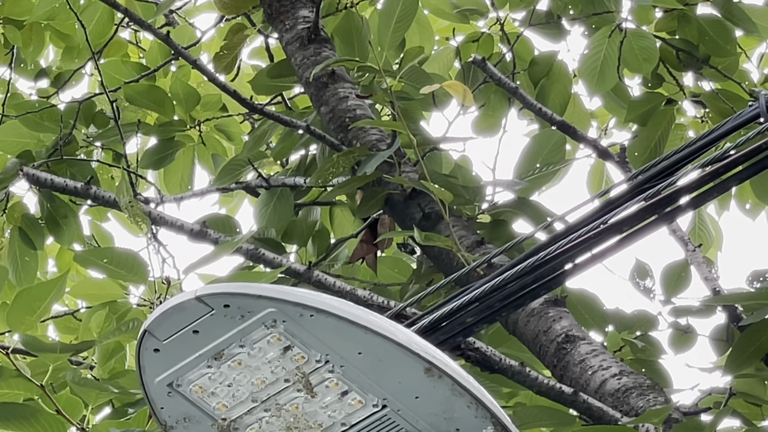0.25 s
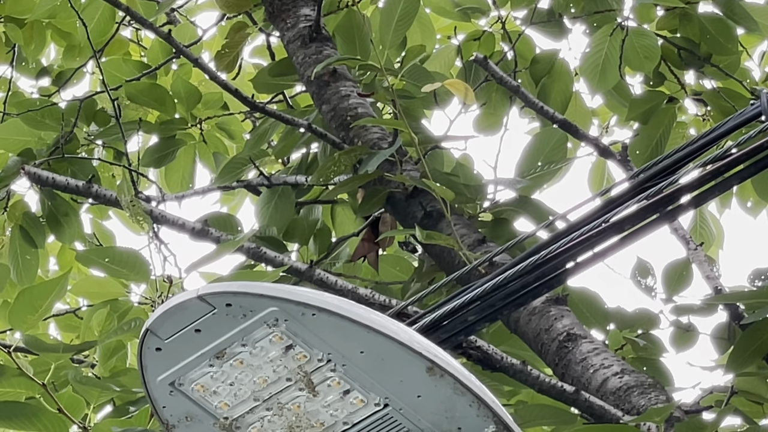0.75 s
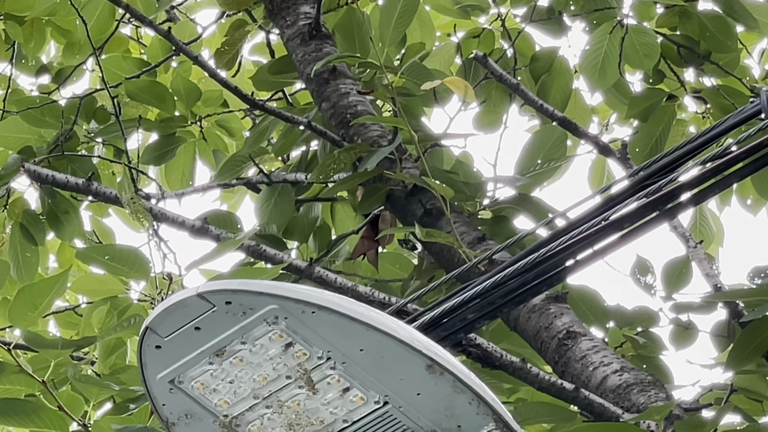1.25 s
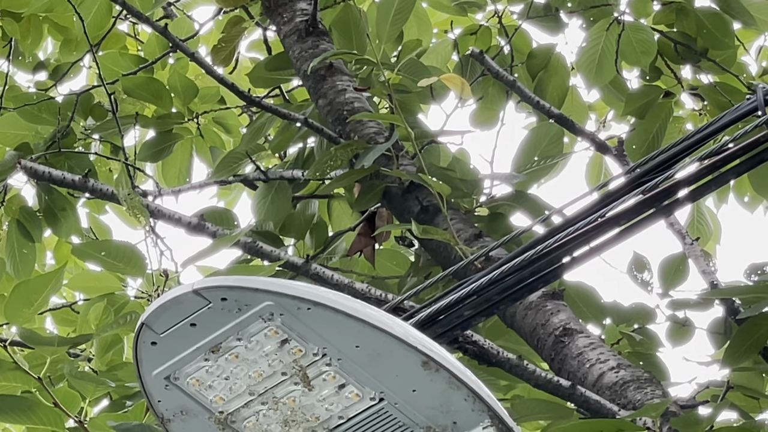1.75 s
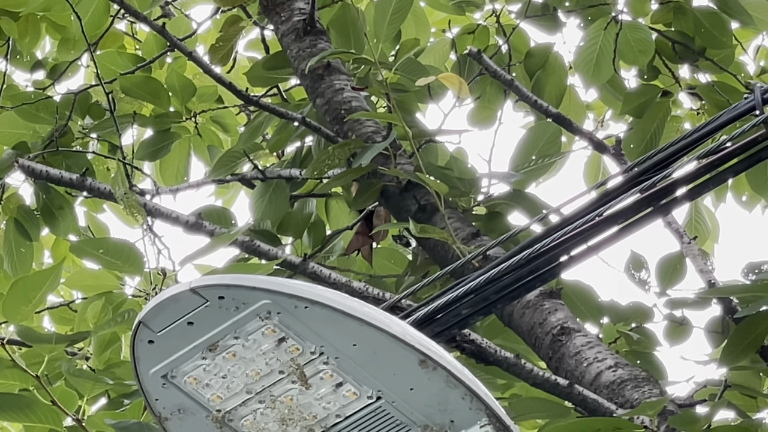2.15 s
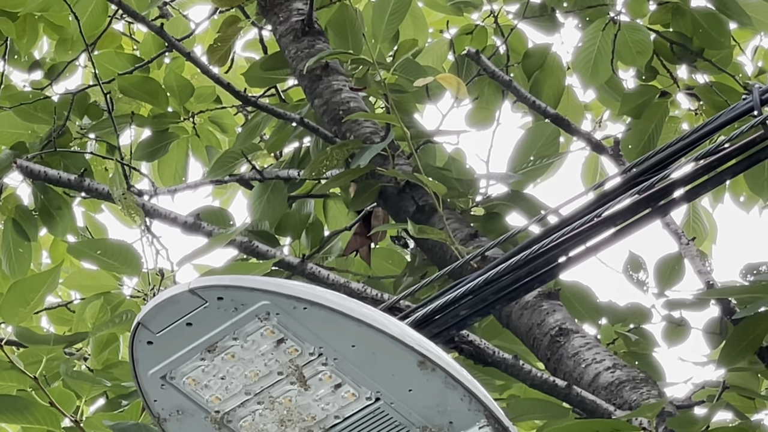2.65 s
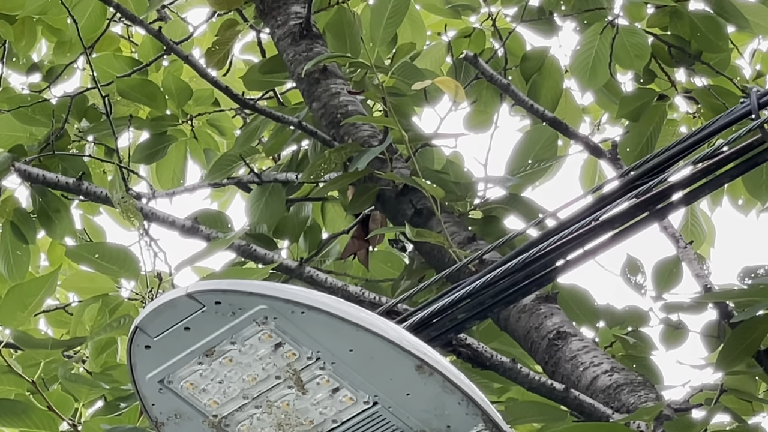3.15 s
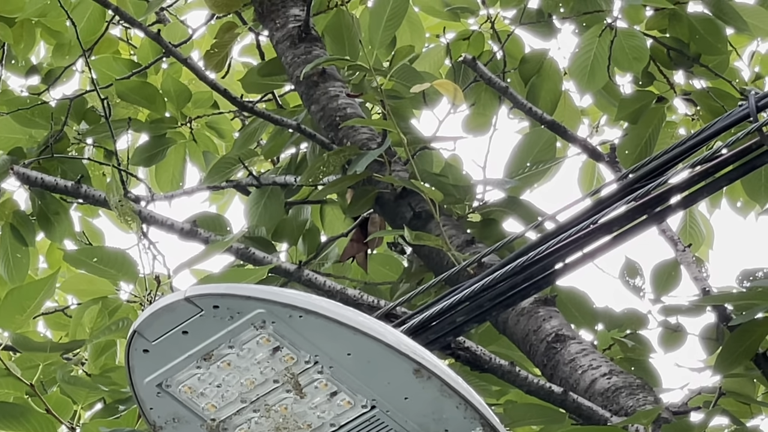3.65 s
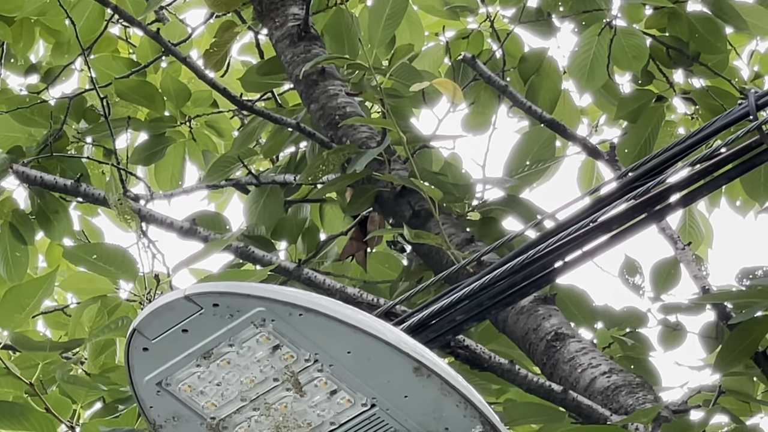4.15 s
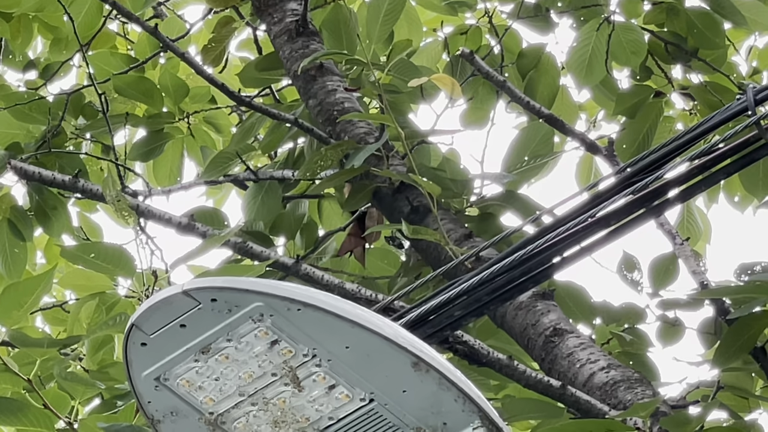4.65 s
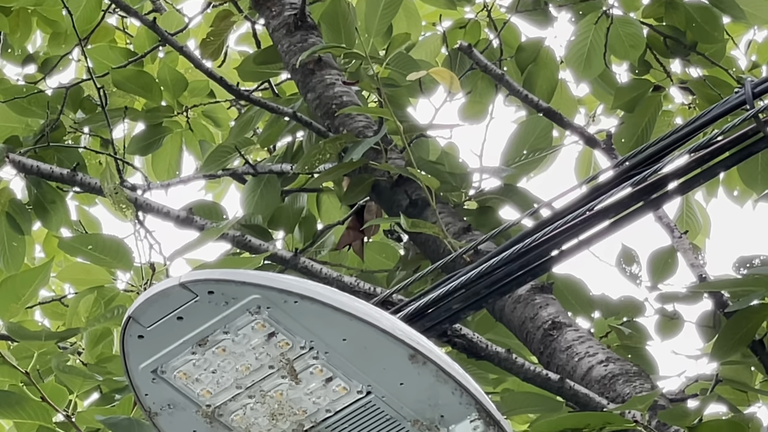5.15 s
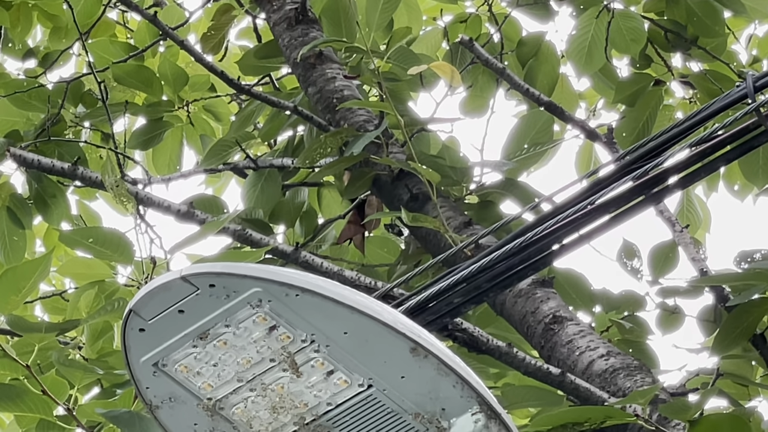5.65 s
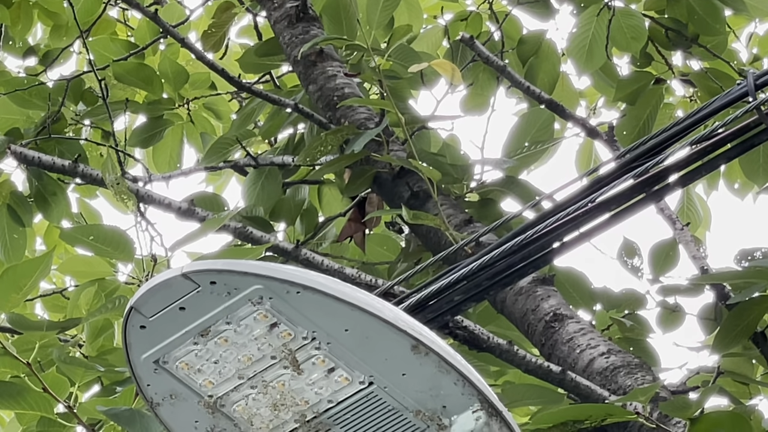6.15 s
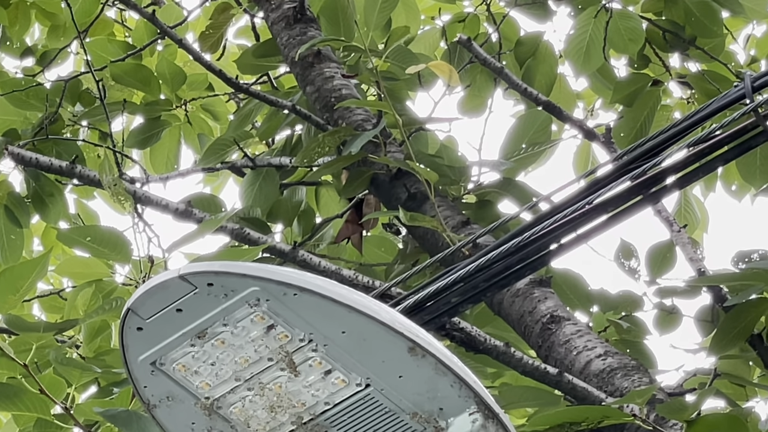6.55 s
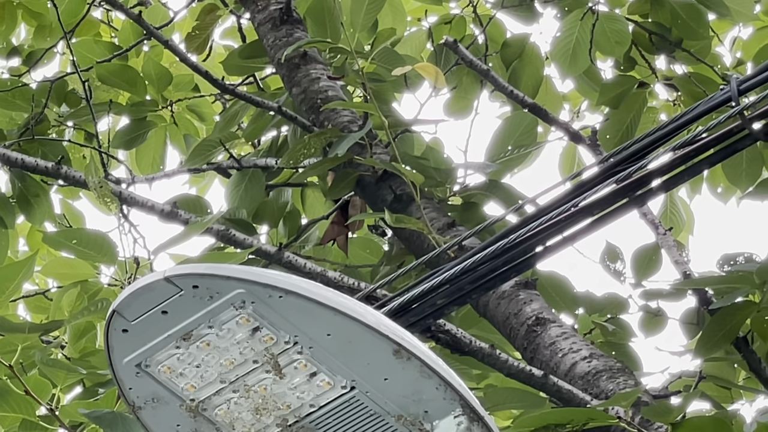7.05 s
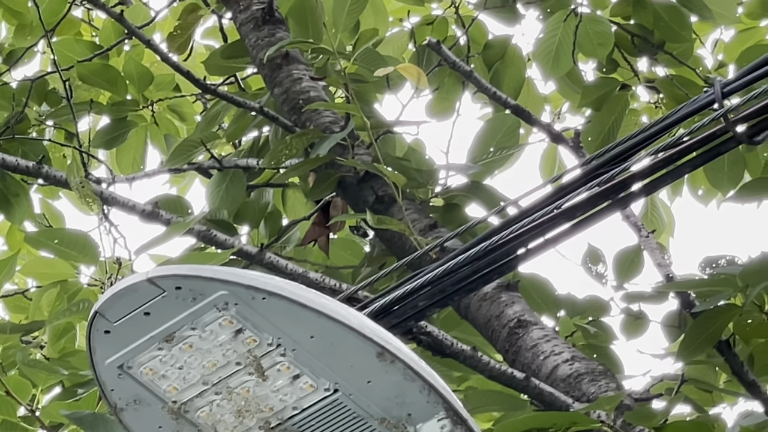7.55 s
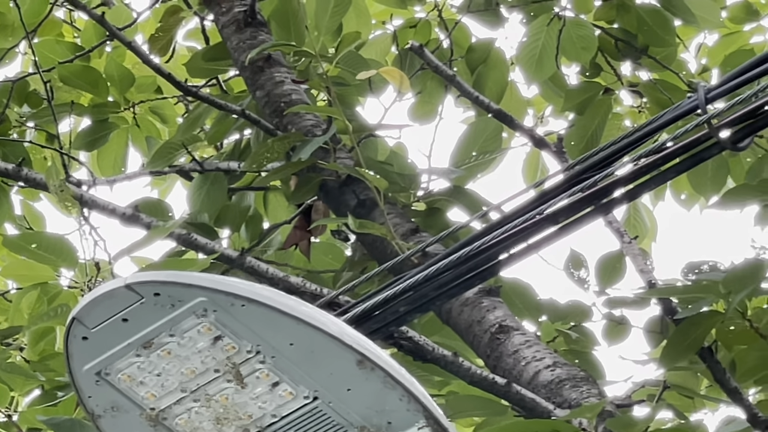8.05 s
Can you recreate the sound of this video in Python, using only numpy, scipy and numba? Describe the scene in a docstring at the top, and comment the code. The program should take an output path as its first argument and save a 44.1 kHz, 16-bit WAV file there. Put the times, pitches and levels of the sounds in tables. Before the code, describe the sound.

A chorus of cicadas makes a steady, high hiss in street trees, heard from below over faint distant traffic. After about two seconds one nearer cicada joins with seven buzzing pulses that grow louder, alternating with a shrill ring. The last note sags, turns raspy and dies down. A few soft dull knocks and faint brief hums come from the street, and the chorus eases near the end.

```python
"""Under a street tree, a cicada sings over a chorus of others, distant traffic, brief hums and knocks.
Its two tymbals click in turn, rib by rib, and ring its body. Each pump of the abdomen swaps a shrill
ring for a low one; on the seventh the song sags, turns raspy and dies down.
A microphone below hears it through two ports, so each band reaches left and right with its own phase."""
import sys
import numpy as np
from scipy import signal
from scipy.fft import rfft, irfft
from scipy.io import wavfile
from scipy.ndimage import uniform_filter1d
from numba import njit

SR = 44100
rng = np.random.default_rng(int(sys.argv[2]) if len(sys.argv) > 2 else 0)


def transcribe(signal):
    """Save signal, clipped to [-1, 1], as a 16-bit WAV file at the path in sys.argv[1]."""
    frames = np.atleast_2d(signal).T
    limited = np.clip(frames, -1, 1)
    pcm = np.round(limited * 32767).astype(np.int16)
    wavfile.write(sys.argv[1], SR, pcm)


N = 366912
T = np.arange(N) / SR
HZ = np.fft.rfftfreq(N, 1 / SR)
STEADY_JITTER_S = 4e-6  # click timing while the abdomen is shut
# The stereo image, band by band: how wide and how centred each band sounds. Each row: frequency in Hz,
# left phase lead in radians, likeness from 0 to 1, left minus right in dB.
STEREO_IMAGE = [(82.5, 0, 1, 1), (252, 0.2, 0.84, 2), (950, 0.3, 0.24, 3), (1600, -.1, 1, 0),
                (2500, -.15, 1, 0), (3400, -0.5, 0.81, 0), (5000, 0.85, 1, 0.5), (5840, -1.16, 0.5, -4.5),
                (6500, 0, 0.4, 6.5), (6610, 0.5, 0.25, -1.5), (7200, -1.9, .85, 0), (8100, -2.6, .95, 0),
                (8380, -3.12, .999, 0), (8900, -3.17, .999, 0), (9200, -3.5, .97, 0), (11260, -5, 0.39, 0),
                (12300, -5.9, .8, 0), (13200, -6.27, 1, 0)]


def undb(db):
    """Gain of a level in dB."""
    return 10 ** (np.asarray(db) / 20)


def level(x, db):
    """Scale to an rms level."""
    return x * undb(db) / np.sqrt(np.mean(x ** 2))


def in_time(table):
    """Breakpoints to automation curves, one value a sample."""
    times, *columns = np.transpose(table)
    return [np.interp(T, times, column) for column in columns]


def in_hz(table, hz):
    """Columns of a spectrum at the given frequencies."""
    points_hz, *columns = np.transpose(table)
    return [np.interp(np.log(hz + 1), np.log(points_hz), column) for column in columns]


def walk(rate):
    """Smooth drift: random values held 1 / rate seconds and slewed twice."""
    hold = int(SR / rate)
    steps = np.repeat(rng.standard_normal(N // hold + 1), hold)
    return uniform_filter1d(uniform_filter1d(steps, hold), hold)[:N]


def ring(x, hz, width_hz):
    """A resonance applied twice, for steep skirts."""
    b, a = signal.iirpeak(hz, hz / width_hz, SR)
    return signal.lfilter(b, a, signal.lfilter(b, a, x))


@njit
def moving_ring(x, hz, width_hz):
    """State-variable band-pass whose centre moves every sample."""
    y, band_state, low_state = np.empty(len(x)), 0., 0.
    for i in range(len(x)):
        tuning, damping = np.tan(np.pi * hz[i] / SR), width_hz / hz[i]
        band = (band_state + tuning * (x[i] - low_state)) / (1 + tuning * (tuning + damping))
        band_state, low_state = 2 * band - band_state, low_state + 2 * tuning * band
        y[i] = damping * band
    return y


def bands(colour, lowest_hz, count):
    """Slices of coloured noise half an octave apart: centre in Hz and two unrelated signals."""
    spectrum = rfft(rng.standard_normal((2, N))) * undb(in_hz(colour, HZ)[0])
    for k in range(count):
        centre = lowest_hz * np.sqrt(2) ** k
        octaves = np.clip(np.log2((HZ + 1) / centre), -.5, .5)
        yield centre, irfft(spectrum * np.cos(np.pi * octaves) ** 2, N)


def traffic():
    """Far-off engine rumble that swells a little, under a steadier tyre rush."""
    # The tone of the road. Each row: frequency in Hz, relative level in dB.
    road_colour = [(24, -24), (33, -23), (43, 3), (62, 0.5), (85, -4), (160, -10), (329, -14.5), (900, -20),
                   (1800, -27), (2400, -38.5), (3200, -40.5)]
    # Its ebb and flow. Each row: time in seconds, rumble in dB, rush in dB.
    road_levels = [(0, -44, -45.5), (.7, -46, -47.5), (2, -46.5, -49), (3.3, -46.5, -48), (5, -44, -49),
                   (6.5, -44.5, -48.5), (7.6, -44, -47), (8.3, -43.5, -47)]
    spectrum = rfft(rng.standard_normal((2, N))) * undb(in_hz(road_colour, HZ)[0])
    bass = 1 / (1 + (HZ / 110) ** 4)  # crossover at 110 Hz
    rumble = irfft(spectrum * bass, N) * undb(1.5 * walk(3))
    rush = irfft(spectrum * (1 - bass), N) * undb(.8 * walk(4))
    rumble_db, rush_db = in_time(road_levels)
    return level(rumble, 0) * undb(rumble_db) + level(rush, 0) * undb(rush_db)


def hums():
    """Brief tones from the street, wavering in pitch and level."""
    # Each row: start in seconds, end in seconds, pitch in Hz, level in dB.
    hum_cues = [(.25, 0.557, 125, -46), (5.32, 5.441, 535, -53), (5.4, 5.95, 301, -52),
                (5.633, 5.74, 411, -51), (5.997, 6.12, 406, -53), (6.95, 7.296, 258.5, -51)]
    out = np.zeros(N)
    for start, end, hz, db in hum_cues:
        swell = np.sin(np.pi * np.clip((T - start) / (end - start), 0, 1)) ** .18
        gain = undb(db + 2.2 * walk(14)) * swell
        out += gain * np.sin(2 * np.pi * np.cumsum(hz + 3 * walk(9.5)) / SR)
    return out


def knocks():
    """Dull knocks: a damped thud with a short noisy crack."""
    # Each row: start in seconds, level in dB, thud in Hz, crack in Hz, crack against thud in dB.
    knock_cues = [(3.989, -33, 185, 450, -10), (4.545, -35, 175.3, 450, -4.5), (4.951, -35, 133, 760, -7.5),
                  (7.508, -35, 193, 494, -19)]
    attack_s, thud_t60_s, crack_t60_s = .003, .11, .17
    out, t = np.zeros(N), T[:SR // 5]
    for start, db, thud_hz, crack_hz, crack_db in knock_cues:
        thud = np.sin(2 * np.pi * thud_hz * t) * undb(-60 * t / thud_t60_s)
        noise = ring(rng.standard_normal(len(t)), crack_hz, width_hz=420)
        crack = level(noise, crack_db) * undb(-60 * t / crack_t60_s)
        out[int(start * SR):][:len(t)] += undb(db) * (thud + crack) * np.minimum(t / attack_s, 1)
    return out


def rib_clicks(cycle_hz, jitter_s):
    """Each tymbal rib buckles once a cycle; timing and strength drift, so the overtones wax and wane."""
    # One muscle cycle, left tymbal then right. Each row: place in the cycle from 0 to 1, level in dB.
    ribs = [(0, -0.5), (0.069, -5), (0.158, -3.5), (0.489, 1.5), (.556, -7), (0.659, 1)]
    cycles = np.cumsum(cycle_hz) / SR
    whole_cycles = np.arange(1, cycles[-1] - 1)
    slip_s = 5e-5 * walk(4)  # the right tymbal slips against the left
    out = np.zeros(N)
    for share, db in ribs:
        due_s = np.interp(whole_cycles + share, cycles, T)
        due = (due_s * SR).astype(int)
        timing_scatter, level_scatter = rng.standard_normal((len(due), 2)).T
        drift_s = 3.5e-5 * (share > 0) * walk(14)[due] + (share > .4) * slip_s[due]
        position = (due_s + drift_s + jitter_s[due] * timing_scatter) * SR
        strength = undb(db + 2 * walk(14)[due] + 1.2 * level_scatter)
        # a windowed sinc puts the click between samples
        taps = np.floor(position)[:, None] + np.arange(-7, 9)
        offset = taps - position[:, None]
        click = np.sinc(offset) * np.cos(np.pi * offset / 16) ** 2
        np.add.at(out, np.clip(taps, 0, N - 1).astype(int), click * strength[:, None])
    return out


def wall_echoes(hiss):
    """Short echoes off trunks and walls comb the hiss."""
    rise_s, t60_s = .004, .03
    t = T[:SR // 40]
    tail = rng.standard_normal(len(t)) * np.minimum(t / rise_s, 1) ** 2 * undb(-60 * t / t60_s)
    tail = level(tail, db=-9) / np.sqrt(len(t))
    return hiss + signal.fftconvolve(hiss, tail[None])[:, :N]


def chorus():
    """Too many cicadas to tell apart: a wavering, throbbing hiss, a ringing band and two nearer buzzes."""
    # The ride of the chorus. Each row: time in seconds, level in dB, tilt in dB per octave.
    chorus_ride = [(0, -27, -1), (.3, -27.5, -0.5), (1, -28, 0), (2, -27.5, 0), (3, -28.5, -0.5),
                   (4, -28.5, 0), (5, -29.5, -0.5), (6, -28.5, -1.5), (7, -28.5, -0.5), (7.7, -30.5, -0.5),
                   (7.85, -30, -1), (7.95, -29.5, -0.5), (8.03, -31.5, -0.5), (8.1, -33.5, -1.5),
                   (8.32, -36.5, -3)]
    # The tone of the hiss. Each row: frequency in Hz, relative level in dB.
    hiss_colour = [(2000, -29), (2700, -21), (3400, -7), (4400, -4.5), (4850, -1.5), (5500, -5), (6900, 0),
                   (8000, -1.5), (8700, .5), (9700, 1), (10400, -3), (12300, -3), (13150, -9), (13800, -37),
                   (16000, -45)]
    # The ringing band swells on its own. Each row: time in seconds, level in dB.
    ringing_ride = [(0, -41), (.3, -46), (1.2, -42), (1.8, -50), (2.4, -43), (5, -49), (6.5, -67),
                    (7.3, -46), (7.75, -47), (7.92, -45), (8.05, -58), (8.32, -52)]
    # Neighbours whose clicks are steady enough to buzz. Each row: muscle cycle in Hz, ring in Hz,
    # width in Hz, level against the hiss in dB.
    neighbours = [(176, 4800, 1000, -19), (191, 6700, 1300, -16)]
    throb_hz, throb_depth, throb_band_hz = 52, .16, 8600
    level_db, tilt_db = in_time(chorus_ride)
    throb_phase = 2 * np.pi * np.cumsum(throb_hz + 1.32 * walk(3.04)) / SR
    throb = np.cos(throb_phase) * (1 + .5 * walk(1.87))
    hiss = 0
    for hz, noise in bands(hiss_colour, lowest_hz=2050, count=7):
        depth = throb_depth * np.exp(-(np.log2(hz / throb_band_hz) / .4) ** 2)
        waver_db = .29 * walk(3.06) + .95 * walk(7) + 1.36 * walk(14)
        hiss = hiss + noise * (1 + depth * throb) * undb(waver_db + tilt_db * np.log2(hz / 6000))
    ringing = ring(rng.standard_normal((2, N)), hz=4890, width_hz=830)
    bed = level(wall_echoes(hiss), 0)
    for cycle_hz, hz, width_hz, db in neighbours:
        clicks = rib_clicks(cycle_hz + 3 * walk(3), np.full(N, STEADY_JITTER_S))
        bed[0] += level(ring(clicks, hz, width_hz), db) * undb(3.8 * walk(2.98))
    return bed * undb(level_db) + level(ringing, 0) * undb(in_time(ringing_ride)[0])


def abdomen_pumps():
    """Curves for air sac pitch, muscle cycle, low ring, shrill ring and jitter; each pump moves alike."""
    # One pump a note. Each row: opening and closing in seconds, sac peak in Hz, open low ring in dB;
    # muscle cycle in Hz after the previous close, before opening and once ajar; low drone while shut
    # in dB; shrill ring in dB after the previous close and before opening.
    pumps = [(2.041, 2.276, 4350, -40, 171.3, 171.7, 176.3, -58, -58, -50),
             (2.599, 2.896, 5050, -39, 173.4, 174, 179.3, -56, -52, -36.5),
             (3.121, 3.403, 5150, -33.5, 177.5, 178.7, 182.6, -55, -41, -33),
             (3.641, 3.9, 5100, -32.5, 179.7, 180.2, 182.4, -49.5, -37.5, -28.5),
             (4.158, 4.419, 5150, -32.5, 181, 182, 183.8, -50.5, -29.5, -28.5),
             (4.65, 4.893, 5250, -32, 182, 182.4, 184.7, -52.5, -28.5, -28),
             (5.15, 5.44, 5050, -33.5, 182.7, 182.4, 183.2, -54.5, -28.5, -26.5)]
    # The last note never shuts; it sags away. Each row: time in seconds, sac pitch in Hz,
    # muscle cycle in Hz, low ring in dB, shrill ring in dB.
    dying_fall = [(5.42, 3690, 179.8, -34.5, -40), (5.499, 3740, 176, -34.5, -40),
                  (5.56, 3730, 173, -35, -47), (5.62, 3704, 169.8, -35, -46), (5.72, 3710, 164.5, -35, -50),
                  (5.84, 3750, 155, -35, -64), (6, 3810, 143, -37, -74), (6.251, 3695, 134, -44, -77)]
    # The clicks lose their beat. Each row: time in seconds, jitter in seconds.
    rasp = [(5.6, 8e-6), (5.8, 1.6e-5), (6, 4e-5)]
    opening_s, closing_s, swell_s, accent_s = .04525, .038, .025, .023
    sac_shut_hz, sac_rested_hz, sac_ajar_hz = 2800, 2450, 3650
    swell_db, accent_db = 3, 5  # a note swells and ebbs; the drone bumps as the abdomen shuts
    low_sag_db, drone_sag_db, cycle_sag_hz = .4, 4, 1.8
    shrill_open_db, shrill_drop_db, shrill_fade_s, shrill_return_s = -50, 4, .074, .092
    opening_jitter_s, open_jitter_s = 1.6e-5, 8e-6
    shut = 1.6  # the song fades in around this time, in seconds
    hush = (shut - closing_s, -85)
    sac, cycle, low, shrill, jitter = [], [], [hush], [hush], []
    for (opens, closes, peak_hz, low_db, after_hz, before_hz, ajar_hz,
         drone_db, shrill_from_db, shrill_to_db) in pumps:
        ajar, narrowing = opens + opening_s, closes - closing_s
        crest = [(opens + share * (closes - opens), peak_hz) for share in (.39, .63)]
        sac += [(shut, sac_shut_hz), (opens, sac_rested_hz), (ajar, sac_ajar_hz),
                *crest, (narrowing, sac_ajar_hz)]
        cycle += [(shut, after_hz), (opens, before_hz),
                  (ajar, ajar_hz), (narrowing, ajar_hz - cycle_sag_hz)]
        low += [(shut, drone_db + accent_db), (shut + accent_s, drone_db),
                (opens, drone_db - drone_sag_db), (ajar, low_db - swell_db),
                (ajar + swell_s, low_db + low_sag_db), (narrowing - swell_s, low_db - low_sag_db),
                (narrowing, low_db - swell_db / 2)]
        shrill += [(shut, shrill_from_db), (opens, shrill_to_db), (ajar, shrill_to_db - shrill_drop_db),
                   (opens + shrill_fade_s, shrill_open_db), (closes - shrill_return_s, shrill_open_db)]
        jitter += [(shut - closing_s, open_jitter_s), (shut, STEADY_JITTER_S),
                   (opens - accent_s / 2, STEADY_JITTER_S), (opens, opening_jitter_s),
                   (ajar, opening_jitter_s), (ajar + accent_s / 2, open_jitter_s)]
        shut = closes
    cycle.pop()  # the last note slides straight into the dying fall
    fall_times, *endings = np.transpose(dying_fall)
    for moves, ending in zip((sac, cycle, low, shrill), endings):
        moves.extend(zip(fall_times, ending))
    return [in_time(moves)[0] for moves in (sac, cycle, low, shrill, jitter + rasp)]


def leaf_scatter(song):
    """Leaves and branches scatter short echoes that differ between left and right."""
    t, t60_s = T[:SR // 10], .05
    tails = rng.standard_normal((2, len(t))) * undb(-60 * t / t60_s)
    tails /= np.sqrt(np.sum(tails ** 2, axis=1, keepdims=True))
    near, scattered = (signal.fftconvolve(song, tail)[:N] for tail in tails)
    return np.array([song + undb(-12) * near, scattered])


def cicada():
    """The soloist: rib clicks ring the shrill modes, the swept air sac and the low tymbal modes."""
    # The shrill modes. Each row: pitch in Hz, width in Hz, relative level in dB.
    shrill_modes = [(12150, 800, -6.5), (12600, 700, -1), (12950, 600, -1), (15150, 1500, -7)]
    # The low tymbal modes. Each row: pitch in Hz, width in Hz, relative level in dB,
    # sac pitch in Hz above which the mode fades in.
    low_modes = [(3650, 500, -2, 2900), (4030, 500, -.5, 2900), (4850, 800, -1, 3600),
                 (6600, 600, -3, 3600)]
    # How well the sac radiates. Each row: sac pitch in Hz, relative level in dB.
    sac_radiation = [(2800, -2.5), (3200, -9), (3900, -7), (4900, -3)]
    fade_span_hz, sac_width_hz = 800, 1350.
    sac_hz, cycle_hz, low_db, shrill_db, jitter_s = abdomen_pumps()
    clicks = rib_clicks(cycle_hz, jitter_s)
    shrill = sum(undb(db) * ring(clicks, hz, width) for hz, width, db in shrill_modes)
    sac_hz = sac_hz + 150 * walk(7)
    sac = clicks
    for _ in range(3):  # steep skirts
        sac = moving_ring(sac, sac_hz, sac_width_hz)
    # so small a body radiates little below its lowest mode
    radiated = signal.sosfilt(signal.butter(6, 3450, "high", fs=SR, output="sos"), clicks)
    tymbals = sum(level(ring(radiated, hz, width), db) * np.clip((sac_hz - from_hz) / fade_span_hz, 0, 1)
                  for hz, width, db, from_hz in low_modes)
    low = undb(-4.5) * tymbals + level(sac, in_hz(sac_radiation, sac_hz)[0])
    low_gain = undb(low_db + 1.2 * walk(12))  # both rings flutter in level
    shrill_gain = undb(shrill_db + 1.8 * walk(21.99))
    return low_gain * low + shrill_gain * level(shrill, 0)


def scene():
    """Mix the sources' mid and side parts into left and right, each band with its own width."""
    common, unlike = leaf_scatter(cicada()) + chorus() + traffic()
    common = common + hums() + knocks()
    likeness = np.clip(in_hz(STEREO_IMAGE, HZ)[1], 0, 1)
    mid = rfft(common) * np.sqrt((1 + likeness) / 2)
    side = rfft(unlike) * np.sqrt((1 - likeness) / 2)
    return irfft(np.array([mid + side, mid - side]), N)


def record(dry):
    """Each band leans left or right in phase and level; the recorder cuts the top."""
    lead, _, balance_db = in_hz(STEREO_IMAGE, HZ)
    left_response = np.exp(.5j * lead) * undb(balance_db / 2)
    wet = irfft(rfft(dry) * np.array([left_response, 1 / left_response]), N)
    top_hz = 15800
    return signal.sosfilt(signal.ellip(10, .2, 80, top_hz, fs=SR, output="sos"), wet)


dry = scene()
out = record(dry)
transcribe(out)
```